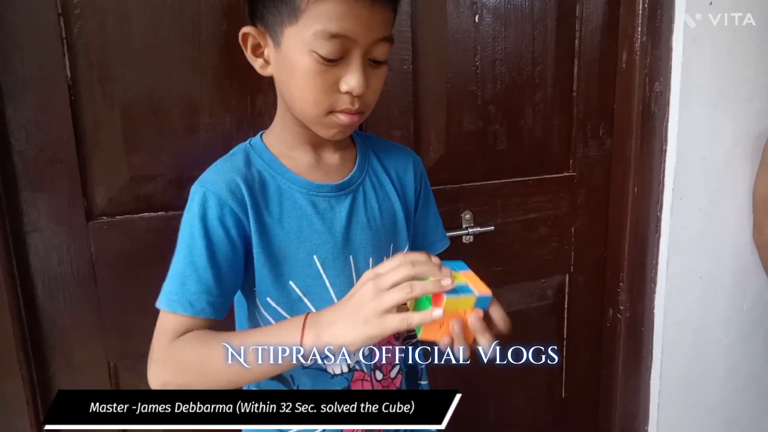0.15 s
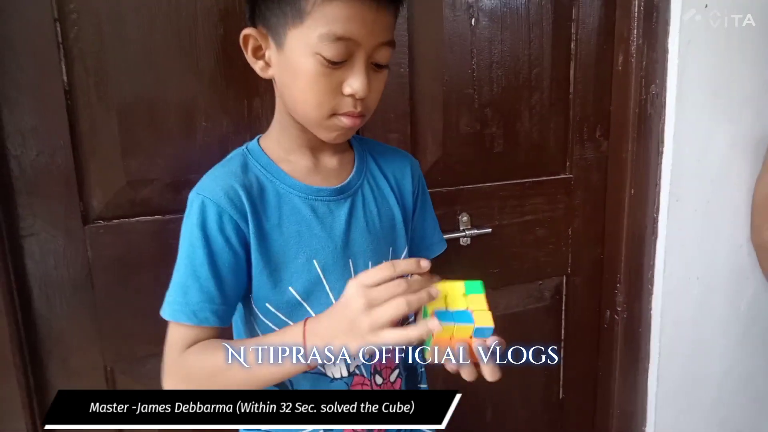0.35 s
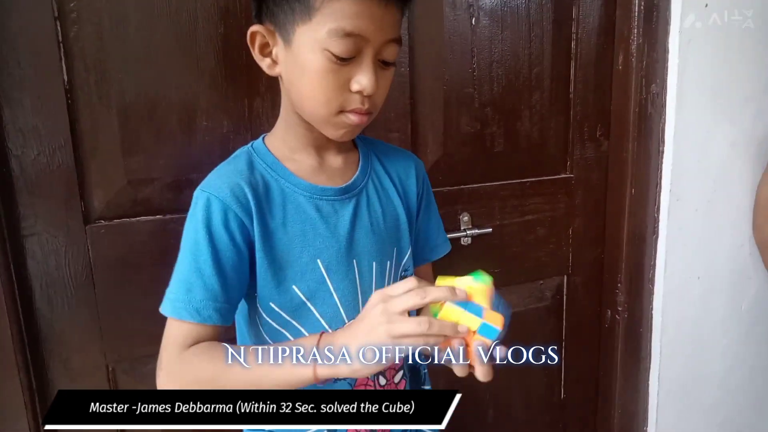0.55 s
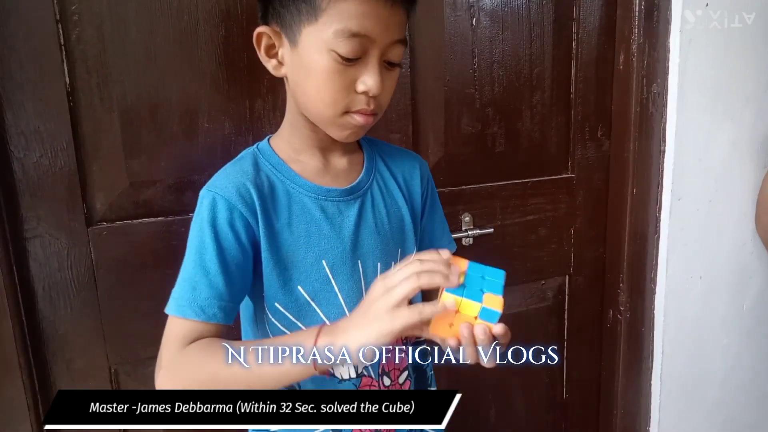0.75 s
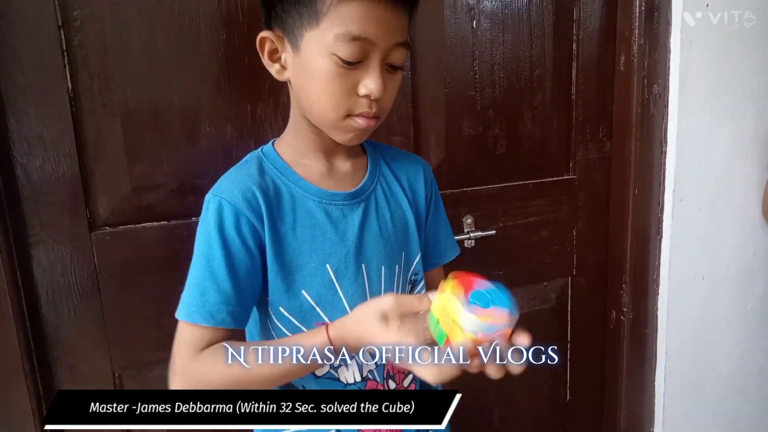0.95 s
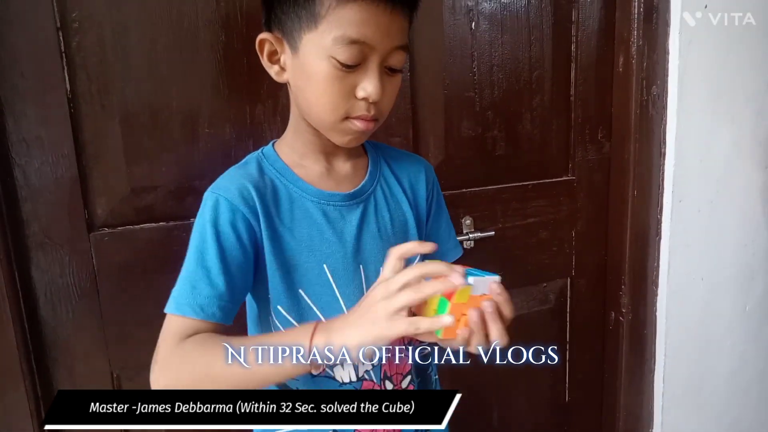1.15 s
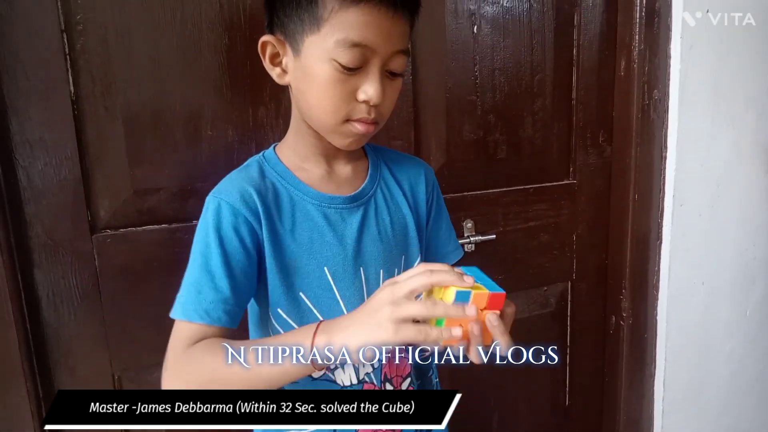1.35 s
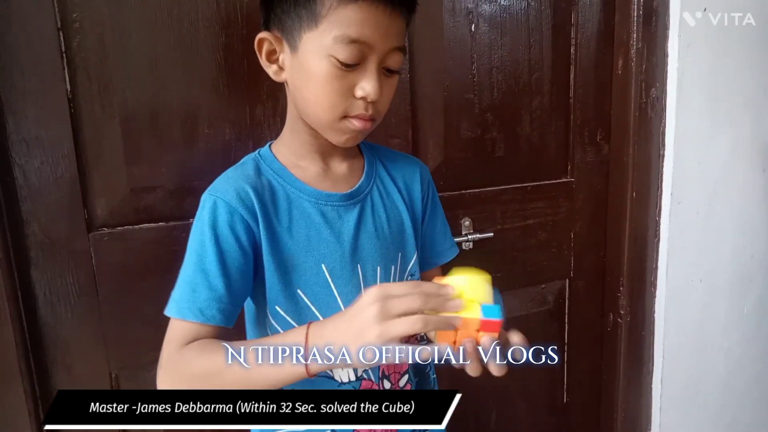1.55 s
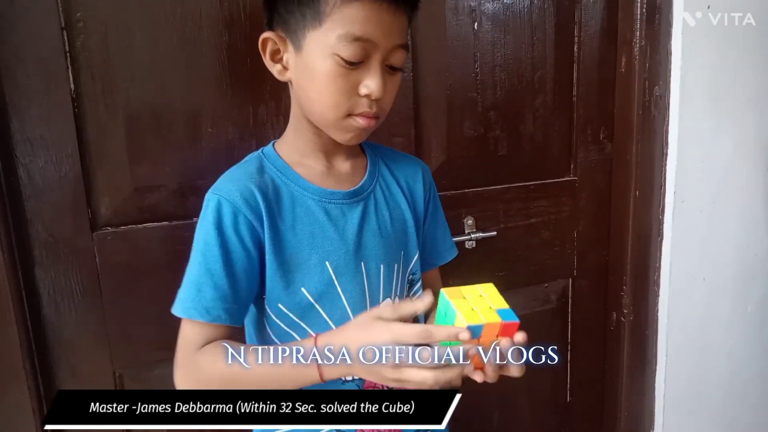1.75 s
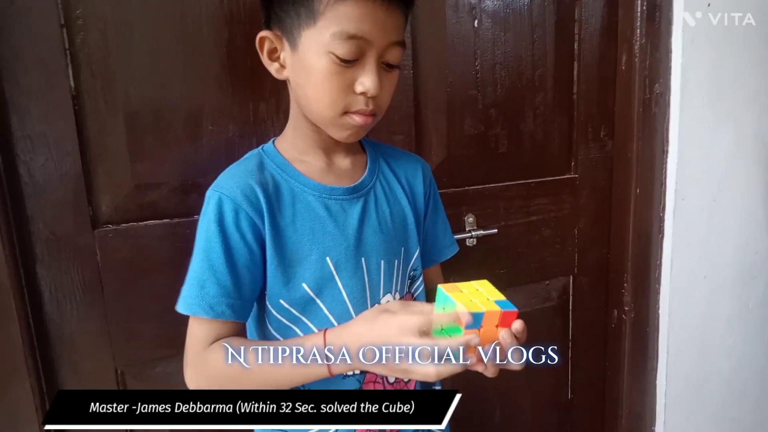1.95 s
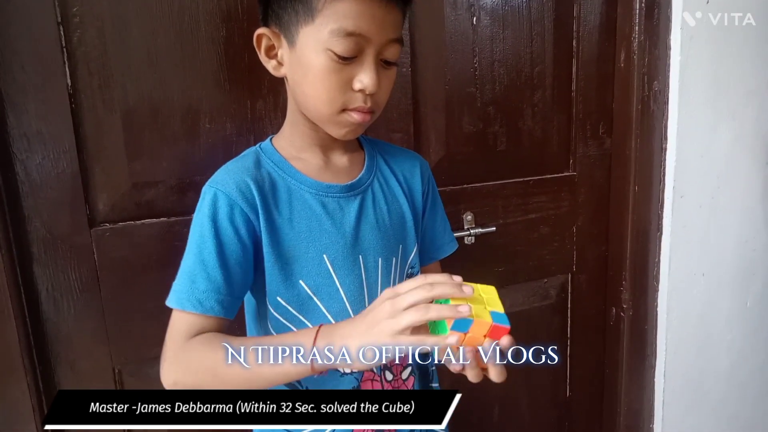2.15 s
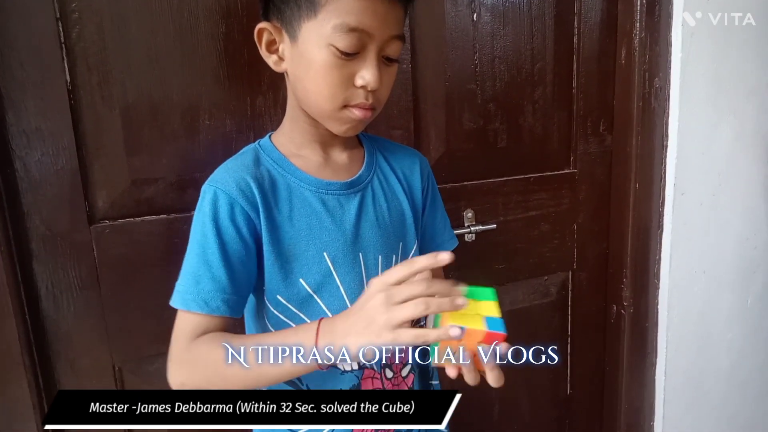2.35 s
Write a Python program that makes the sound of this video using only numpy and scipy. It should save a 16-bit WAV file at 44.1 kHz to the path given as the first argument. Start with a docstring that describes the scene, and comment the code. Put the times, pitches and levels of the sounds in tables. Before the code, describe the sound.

A plastic puzzle cube is turned fast by hand, clicking and scraping close by indoors

```python
"""Fast plastic scrapes and snaps fill a small hard room: a puzzle cube is turned by hand near a microphone.
Outside, a bird chirps, another whistles and a fuzzy insect note swells and fades over a low hum.
Snaps are noise rattles that ring the cube; scrapes are crowds of tiny noise grains.
Birds are gliding tones; the insect and the hum are shaped noise; one soft low knock sags in pitch."""
import sys
import numpy as np
from scipy import signal
from scipy.fft import rfft, irfft
from scipy.io import wavfile
from scipy.ndimage import uniform_filter1d

SR = 44100
rng = np.random.default_rng(int(sys.argv[2]) if len(sys.argv) > 2 else 0)


def dump(signal):
    """Clip the signal to [-1, 1] and save it as 16-bit WAV at the path in sys.argv[1]."""
    limited = np.clip(np.atleast_2d(signal).T, -1, 1)
    pcm = np.round(limited * 32767).astype(np.int16)
    wavfile.write(sys.argv[1], SR, pcm)


def amplitude_ratio(level_db):
    """Convert a level in decibels to the matching linear amplitude (field) ratio."""
    exponent = np.asarray(level_db, float) / 20
    return 10 ** exponent


N = 105840  # samples in the scene
HZ = np.fft.rfftfreq(2048, 1 / SR)  # frequencies at which filters are drawn

# Tone colour of plastic striking or rubbing plastic: f/Hz, relative level per Hz/dB
CRACK = [(88, -69), (150, -20.5), (545, -12.5), (960, -5.5), (1100, -3), (1310, -16), (2180, -4),
         (3700, 3.5), (5360, -11.5), (8900, -16.5), (12700, -36), (14800, -32), (16000, -46)]


def evened(x):
    """Scales a sound to an rms of one."""
    return x / np.sqrt(np.mean(x ** 2) + 1e-20)


def read(points, hz):
    """Reads a spectrum between its points, on a log-frequency axis."""
    f, value = np.transpose(points)
    return np.interp(np.log(hz + 1), np.log(f + 1), value)


def curve(points):
    """Turns points of time and dB into a gain for every sample."""
    s, db = np.transpose(points)
    return amplitude_ratio(np.interp(np.arange(N) / SR, s, db))


def add(mix, s, sound):
    """Mixes a sound in at a time in seconds."""
    part = mix[round(s * SR):][:len(sound)]
    part += sound[:len(part)]


def causal(db):
    """Makes a filter from a dB spectrum that responds as early as it can (minimum phase)."""
    log = np.log(amplitude_ratio(np.maximum(db, -100)))
    full = np.concatenate([log, log[-2:0:-1]])
    return np.fft.ifft(np.exp(np.conj(signal.hilbert(full)))).real[:len(db)]


def floor():
    """Low hum and outdoor wash: noise with a fixed tone colour and patches that drift in time and pitch."""
    # Tone colour of the background: f/Hz, relative level per Hz/dB
    colour = [(15, -49), (25, -25), (63, 2), (97, -4), (277, -12), (354, -9.5), (575, -14.5), (677, -13),
              (1260, -16), (1650, -18.5), (2000, -10), (3160, -3.5), (3820, -9.5), (4870, -26), (7710, -28),
              (9070, -19), (9840, -31.5), (14800, -47), (16000, -64)]
    # Slow changes of the background: t/s, gain/dB
    outdoor = [(0, 0.5), (.5, 3.5), (1.0, 0), (1.5, .5), (1.9, 0.5), (2.15, 0), (2.4, -1)]
    floor_db, patchy_db, patch_low_hz = -49, 1.3, 375
    hz = np.fft.rfftfreq(1024, 1 / SR)
    a, b, patches = rng.standard_normal((N // 256 + 5, 513, 3)).T
    patches = uniform_filter1d(patches, size=16, axis=0)  # smooth over pitch
    patches = evened(uniform_filter1d(patches, size=12, axis=1))  # smooth over time
    patches = patches / (1 + (patch_low_hz / (hz[:, None] + 1)) ** 2)  # steadier in the bass
    spectrum = (a + 1j * b) * amplitude_ratio(read(colour, hz)[:, None] + patchy_db * patches)
    wash = signal.istft(spectrum, nperseg=1024, noverlap=768)[1][:N]
    return curve(outdoor) * amplitude_ratio(floor_db) * evened(wash)


def insect():
    """A fuzzy high note: noise in a narrow band that swells and fades."""
    # Swells of the insect: t/s, rms level/dB
    swells = [(0, -78), (.15, -73), (.3, -76), (.6, -68), (.75, -64), (.95, -64), (1.15, -80), (1.27, -64),
              (1.36, -66), (1.45, -64.5), (1.6, -65), (1.7, -67), (1.8, -67), (1.95, -64.5), (2.1, -70),
              (2.17, -75), (2.27, -66), (2.4, -66)]
    centre_hz, width_hz = 8860, 360
    hz = np.fft.rfftfreq(N, 1 / SR)
    band = irfft(rfft(rng.standard_normal(N)) / (1 + (2 * (hz - centre_hz) / width_hz) ** 2), N)
    return curve(swells) * evened(band)


def scrape():
    """Layers slide past each other in many tiny slips, each a short dying grain of noise."""
    # Strength of the sliding: t/s, level before the lift of scrape_db/dB
    sliding = [(0.0, -75), (0.28, -64), (0.41, -55), (0.56, -58), (0.73, -60.5), (0.88, -62), (1.18, -69),
               (1.49, -58), (1.86, -77), (1.99, -75), (2.28, -92), (2.4, -62)]
    scrape_db, slips_per_s, slip_spread_db, slip_t60_s = 4.5, 830, 0.5, 0.014
    strength = amplitude_ratio(slip_spread_db * np.minimum(rng.exponential(1, N), 5))
    slips = strength * (rng.random(N) < slips_per_s / SR)
    decay = amplitude_ratio(-60 * np.arange(1000) / SR / slip_t60_s)
    grains = signal.fftconvolve(slips, decay)[:N] * rng.standard_normal(N)
    rub = signal.fftconvolve(grains, causal(read(CRACK, HZ)))[:N]
    return amplitude_ratio(scrape_db) * curve(sliding) * evened(rub)


def clicks():
    """Each snap is a short rattle of pieces that also rings the cube, which is held differently every time."""
    # Snaps of the layers: t/s, relative peak level/dB, bass share/dB, treble share/dB, rattle t60/s
    snaps = [(0.0034, -23, -35, -25, 0.02), (0.0444, -30.5, -14, -20, 0.049),
             (0.0685, -32, -6.5, -13, 0.029), (0.0778, -26.5, -21, -20, 0.065),
             (0.105, -34.5, -6, -8.5, 0.074), (0.1194, -32, -13.5, -28, 0.025),
             (0.179, -24.5, -17.5, -17, 0.037), (0.1834, -21.5, -19, -21.5, 0.046),
             (0.1977, -31.5, -12.5, -15, 0.06), (0.2146, -20.5, -20.5, -13, 0.026),
             (0.2261, -29, -17, -27, 0.03), (0.2481, -25, -16.5, -22, 0.03), (0.3222, -38, -17, -31, 0.025),
             (0.3473, -26, -20, -20, 0.024), (0.3722, -25.5, -6, -13, 0.03), (0.387, -15, -15, -10, 0.055),
             (0.3917, -13.5, -20, -22.5, 0.017), (0.4042, -18.5, -20.5, -39, 0.034),
             (0.4145, -21.5, -11, -26, 0.02), (0.4447, -23.5, -14, -19, 0.03),
             (0.4992, -30, -15, -12, 0.021), (0.5103, -19.5, -15, -16.5, 0.035),
             (0.5426, -16, -13.5, -6.5, 0.023), (0.5475, -9.5, -34.5, -20.5, 0.053),
             (0.5553, -13.5, -38, -10, 0.03), (0.7646, -25, -5.5, -12.5, 0.029),
             (0.7787, -15.5, -25, -32, 0.031), (0.7939, -4.5, -23, -9.5, 0.023),
             (0.8024, -10.5, -20, -24, 0.01), (0.8167, -38, -38, -14, 0.028),
             (1.0715, -29, -15, -20, 0.049), (1.0815, -26, -17.5, -20, 0.08),
             (1.1125, -21.5, -18, -15, 0.025), (1.1224, -15.5, -34, -25.5, 0.022),
             (1.1333, -32.5, 0, -8, 0.03), (1.2017, -35.5, -36, -18, 0.043),
             (1.2396, -30.5, -33, -31, 0.043), (1.3516, -28, -14, -23, 0.03),
             (1.3837, -19, -24.5, -22, 0.031), (1.3983, -37, -20, -24, 0.018),
             (1.4375, -30, -13, -23, 0.079), (1.4688, -34, -21, -28, 0.03),
             (1.4892, -29.5, -16, -20, 0.044), (1.5038, -37, -9, -3, 0.074), (1.51, -9, -20, -15, 0.032),
             (1.5163, -17.5, -30, -32, 0.09), (1.5494, -25, -26, -32, 0.024),
             (1.5656, -24, -10, -12.5, 0.041), (1.5744, -24, -16, -28, 0.018),
             (1.5971, -31.5, -12, -11, 0.033), (1.6248, -28.5, -11, -21.5, 0.022),
             (1.6794, -27.5, -38, -38, 0.021), (1.7344, -42.5, -16, -20, 0.025),
             (1.7862, -34, -16, -17, 0.072), (1.7943, -13.5, -14, -13.5, 0.031),
             (1.8018, -15.5, -12.5, -10.5, 0.02), (1.8065, -16.5, -21, -29, 0.045),
             (1.8488, -23, -21, -19.5, 0.057), (1.8825, -30.5, -12.5, -12, 0.036),
             (2.0033, -33.5, -15, -25, 0.042), (2.0571, -29, -11, -17, 0.068),
             (2.0636, -19.5, -28, -18, 0.025), (2.0772, -22.5, -17, -17, 0.035),
             (2.0826, -16, -19, -16.5, 0.046), (2.0939, -24, -26, -12, 0.019),
             (2.1156, -27, -8, -10.5, 0.03)]
    # Ringing tones of the cube: f/Hz, relative level/dB
    cube = [(835, 0.5), (1150, -32), (1970, -15.5), (2250, -5), (2620, 5.5), (3050, 14), (3350, 13),
            (3730, 5), (4320, -35), (6500, 6), (7600, -9), (8700, -38)]
    click_db, body_low_hz = -8.5, 356
    usual_bass_db, bass_hz, usual_treble_db, treble_hz = -19, 1390, -16, 5000
    ring_cycles, ring_spread_db, ring_db = 24, 3, -2  # a tone falls 60 dB in ring_cycles
    crack_rise_s, swell_s, swell_db, lumps_db = .0009, .005, -16, 2.5
    out, t = np.zeros(N + SR), np.arange(4000) / SR
    hz, db = np.transpose(cube)[:, :, None]
    # A faint noise swells just before each snap, peaking .02 s in
    after = np.maximum(t - .02, 0)
    front = 1 - np.exp(-after / crack_rise_s)
    faint_swell = amplitude_ratio(swell_db) * np.exp(-abs(t - .02) / swell_s)
    low_cut = -20 * np.log10(1 + (body_low_hz / (HZ + 1)) ** 2)
    crack_filter = causal(read(CRACK, HZ))
    for s, peak_db, bass_db, treble_db, t60 in snaps:
        noise, lumps = rng.standard_normal((2, len(t)))
        lumps = amplitude_ratio(lumps_db * evened(uniform_filter1d(lumps, size=40)))
        hit = noise * (front * amplitude_ratio(-60 * after / t60) + faint_swell) * lumps

        # A new grip changes the level and pitch of every ringing tone
        gain, detune = rng.standard_normal((2, len(cube), 1))
        decay = amplitude_ratio(db + ring_spread_db * gain - 60 * t * hz / ring_cycles)
        modes = (decay * np.sin(2 * np.pi * hz * (1 + 0.018 * detune) * t)).sum(0)

        crack = signal.fftconvolve(hit, crack_filter)[:len(t)]
        ring = signal.fftconvolve(hit, modes)[:len(t)]
        both = evened(crack) + amplitude_ratio(ring_db) * evened(ring)
        both = both / np.sqrt(uniform_filter1d(both ** 2, size=130).max())  # loudest moment to one

        bass = (bass_db - usual_bass_db) / (1 + (HZ / bass_hz) ** 4)
        treble = (treble_db - usual_treble_db) / (1 + (treble_hz / (HZ + 1)) ** 4)
        snap = signal.fftconvolve(both, causal(bass + treble + low_cut))[:len(t)]
        add(out, s, amplitude_ratio(peak_db + click_db) * snap)
    return out[round(.021 * SR):][:N]  # start earlier, so each snap lands at its time


def room(x):
    """Three tails of sparse taps, each band dying at its own speed; the feed rotates, so the echo keeps changing."""
    # Decay of the room: f/Hz, t60/s
    decay = [(300, 0.51), (800, 0.15), (2100, 0.27), (3500, 0.23), (5500, 0.16), (9000, 0.25),
             (12000, 0.11), (15000, 0.091)]
    out = np.zeros(N)
    turn = 2 * np.pi * 7.3 * np.arange(N) / SR  # a steady 7.3 rounds per second
    for k in range(3):
        taps = np.zeros(SR // 2)
        at = np.arange(200, SR // 2 - 20, 12)
        taps[at + rng.integers(0, 12, len(at))] = rng.choice([-1., 1.], len(at))
        hz, t, z = signal.stft(taps, SR, nperseg=128)
        z = z * amplitude_ratio(-60 * t / read(decay, hz)[:, None])
        tail = signal.istft(z, SR, nperseg=128)[1]
        feed = np.sqrt(2 / 3) * np.cos(turn + k * 2 * np.pi / 3)
        out += signal.fftconvolve(x * feed, tail / np.linalg.norm(tail))[:N]
    return out


def glide(length, level_db, start_hz, end_hz, bend, peak):
    """A near-sine note gliding between two pitches, loudest near the throat resonance."""
    beak_hz, beak_width_hz, beak_db = 3030, 150, 8
    u = np.arange(0, length, 1 / SR) / length  # progress from 0 to 1
    hz = start_hz + (end_hz - start_hz) * u ** bend
    lift_db = beak_db / (1 + (2 * (hz - beak_hz) / beak_width_hz) ** 2)
    swell = np.sin(np.pi * u ** peak) ** 0.21
    return amplitude_ratio(level_db + lift_db) * swell * np.sin(2 * np.pi * np.cumsum(hz) / SR)


def birds():
    """Falling chirps of one bird and soft whistles of another; a wall echo breaks the glides into beads."""
    # Chirps: t/s, length/s, level before throat lift and echo/dB, top f/Hz, end f/Hz
    chirps = [(0.925, 0.086, -46.5, 3970, 2430), (1.296, 0.079, -41, 3900, 2322),
              (1.652, .095, -48, 3937, 2407)]
    # Whistles: t/s, length/s, level before throat lift and echo/dB, start f/Hz, end f/Hz
    whistles = [(0.282, 0.042, -49, 2640, 2740), (0.428, 0.1188, -43.5, 2220, 2426),
                (0.587, 0.124, -57, 2420, 2294), (2.148, .07, -68, 5050, 5000)]
    wall_echo_s, wall_echo = .00292, .8  # delay, and strength as a factor
    out = np.zeros(N)
    for s, *note in chirps:
        add(out, s, glide(*note, bend=.8, peak=.8))
    for s, *note in whistles:
        add(out, s, glide(*note, bend=1.11, peak=1.3))
    return out + wall_echo * np.roll(out, round(wall_echo_s * SR))


def thump():
    """One soft low knock: a dying sine whose pitch sags."""
    start_s, level_db, t60_s = 1.972, -38.5, 0.21
    top_hz, end_hz, sag_s = 378, 94.5, 0.0062
    out, t = np.zeros(N), np.arange(4000) / SR
    hz = end_hz + (top_hz - end_hz) * np.exp(-t / sag_s)
    add(out, start_s, -amplitude_ratio(level_db - 60 * t / t60_s) * np.sin(2 * np.pi * np.cumsum(hz) / SR))
    return out


def low_swells():
    """The hum briefly gains a pitch: low gliding tones swell up and fade."""
    # Pitched swells: t/s, length/s, level/dB, start f/Hz, end f/Hz
    swells = [(2.12, 0.1, -57, 189, 203), (2.33, 0.052, -53, 227, 246)]
    out = np.zeros(N)
    for s, *note in swells:
        add(out, s, glide(*note, bend=1.4, peak=0.88))
    return out


def scene():
    """Cube and birds share the room's echo; the rest is background."""
    room_db, bird_room_db = -6.5, -5  # how strongly each feeds the room
    cube, song = clicks() + scrape(), birds()
    echo = room(amplitude_ratio(room_db) * cube + amplitude_ratio(bird_room_db) * song)
    background = floor() + insect() + thump() + low_swells()
    return (cube + song + echo + background)[None]


def band_limit(x):
    """A steep low-pass at the top of the band."""
    return signal.sosfilt(signal.butter(12, 16450, fs=SR, output="sos"), x)


def record(dry):
    """The microphone drops the deepest bass and the very top."""
    low_hz, top_hz = 54, 15400
    bass_cut = signal.butter(3, low_hz, "high", fs=SR, output="sos")
    top_cut = signal.butter(12, top_hz, fs=SR, output="sos")
    heard = signal.sosfilt(np.vstack([bass_cut, top_cut]), dry)
    return band_limit(heard)


dry = scene()
out = record(dry)
dump(out)
```